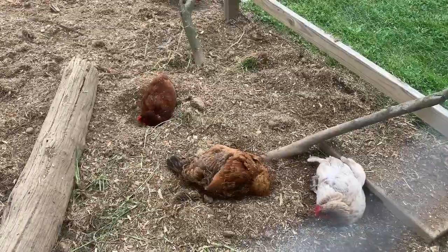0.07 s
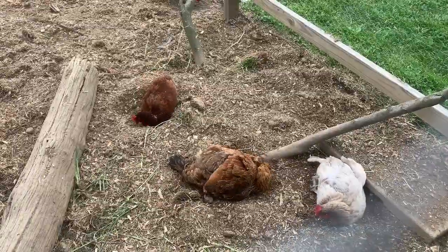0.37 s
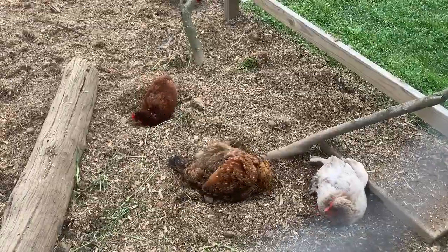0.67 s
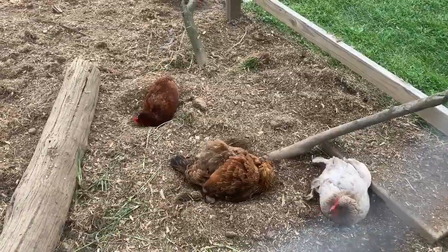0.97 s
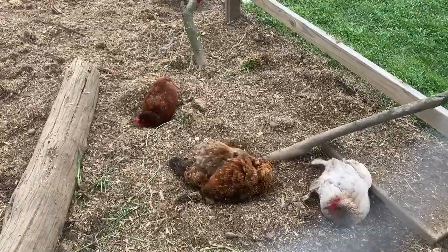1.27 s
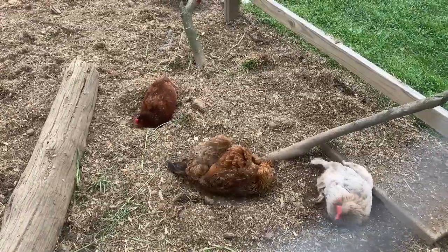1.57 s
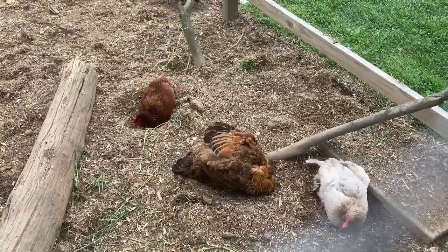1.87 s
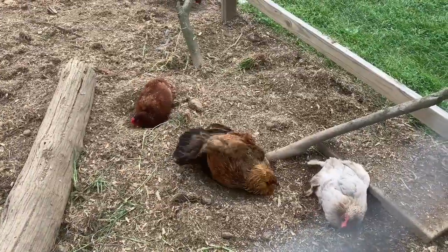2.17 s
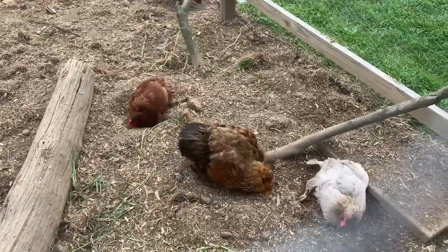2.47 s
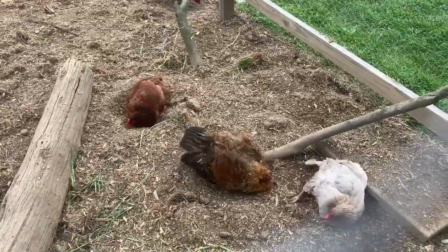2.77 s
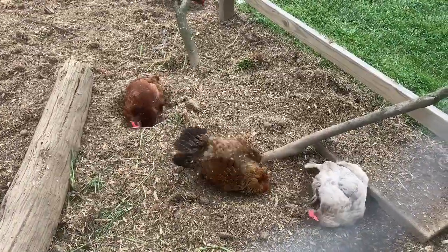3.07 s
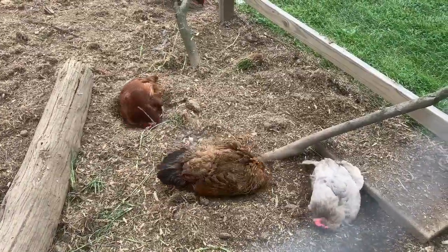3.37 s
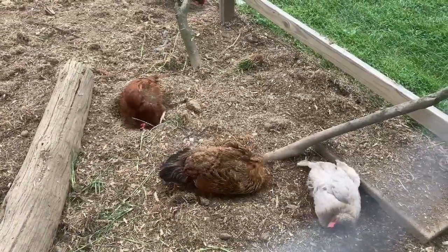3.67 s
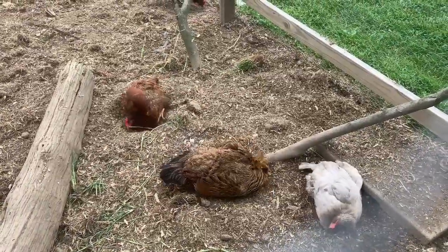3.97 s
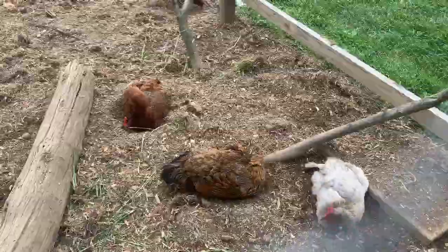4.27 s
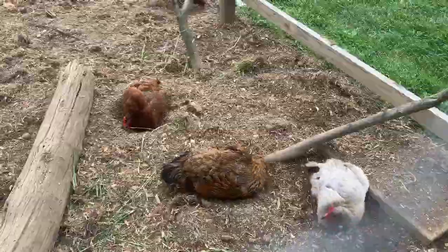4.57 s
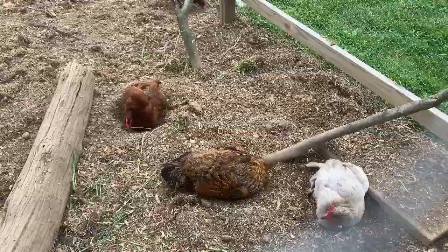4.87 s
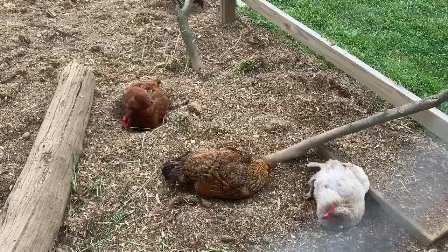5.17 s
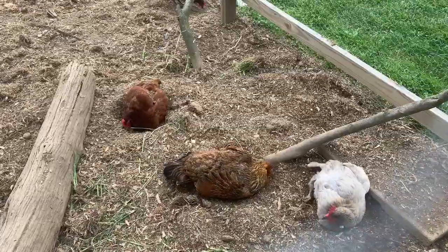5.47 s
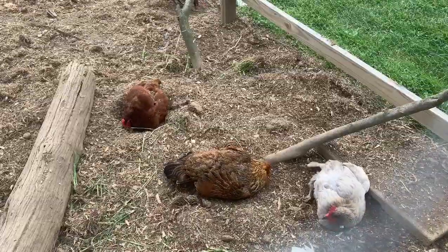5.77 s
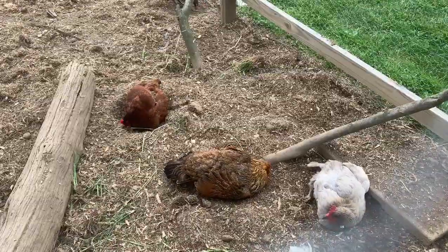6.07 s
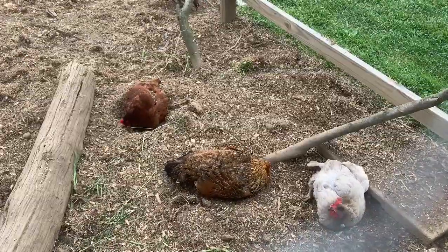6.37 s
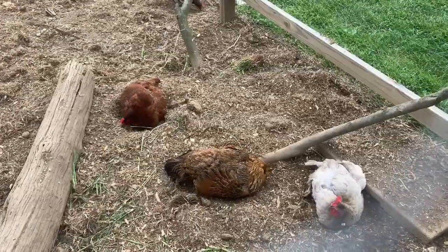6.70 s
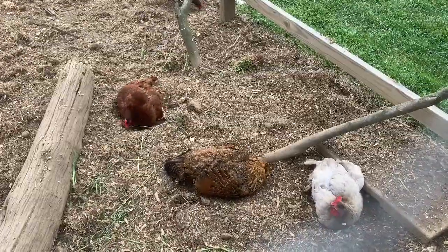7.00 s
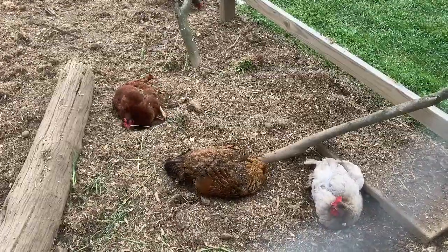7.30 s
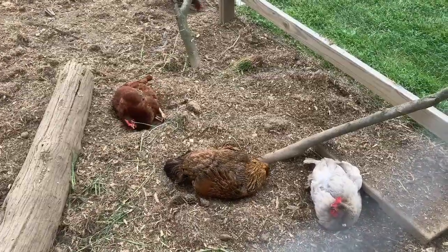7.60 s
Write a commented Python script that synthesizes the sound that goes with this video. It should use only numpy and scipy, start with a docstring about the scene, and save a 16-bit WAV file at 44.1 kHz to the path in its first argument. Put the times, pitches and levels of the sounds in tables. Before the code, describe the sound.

A hen shakes dry dirt from her feathers and a songbird trills, with knocks and rubbing on the microphone.

```python
"""Hens in a dust bath

In a garden run one hen shakes dry dirt out of her feathers: they swish, and crumbs and grit patter down.
Another pecks at a board, which thuds. A songbird whistles one loud phrase to the right, and others answer
from farther off, over a low outdoor rumble. Fingers knock and slide on the hand-held microphone's case."""
import sys
import numpy as np
from scipy import signal
from scipy.fft import rfft, irfft
from scipy.io import wavfile

SR = 44100
rng = np.random.default_rng(int(sys.argv[2]) if len(sys.argv) > 2 else 0)


def put_to_file(sound):
    """Save the sound as 16-bit audio at rate SR, in the file named by the first command-line argument."""
    columns = np.atleast_2d(sound).T  # one column per channel
    safe = np.clip(columns, -1, 1)
    whole_steps = np.round(safe * 32767)
    wavfile.write(sys.argv[1], SR, whole_steps.astype(np.int16))


N = 341334
TIME = np.arange(N) / SR
BINS_HZ = np.maximum(np.arange(N // 2 + 1) * SR / N, 1)


def amp(db):
    """Turn decibels into a number to multiply by."""
    return 10 ** (np.asarray(db) / 20)


def rms_one(x):
    """Scale a sound so that its average strength (rms) is 1."""
    return x / np.sqrt(np.mean(x ** 2) + 1e-20)


def in_time(rows):
    """Join rows of a time and its values into curves, one value per sample."""
    s, *columns = np.transpose(rows)
    return [np.interp(TIME, s, c) for c in columns]


def at_bins(points):
    """Join rows of a frequency and its value into a curve over the whole spectrum."""
    hz, value = np.transpose(points)
    return np.interp(np.log(BINS_HZ), np.log(hz), value)


def gate(start, end, edge):
    """Fade in, hold at 1 and fade out between two times."""
    return np.clip(np.minimum(TIME - start, end - TIME) / edge, 0, 1)


def bloom(t, peak_s):
    """A loudness curve that rises to 1 at its peak time and dies away."""
    return t / peak_s * np.exp(1 - t / peak_s)


def panned(pan_db):
    """Left and right gains; a positive balance leans left."""
    return amp(np.array([[.5], [-.5]]) * pan_db)


def placed(x, pan):
    """Give each frequency of a stereo sound its own left-right balance."""
    return irfft(rfft(x) * panned(at_bins(pan)), N)


def band(x, low_hz, high_hz, order):
    """Keep the part of a sound between two frequencies."""
    return signal.sosfilt(signal.butter(order, [low_hz, high_hz], "band", fs=SR, output="sos"), x)


def contact(low_hz, high_hz, order):
    """A tap: one short push through a broad resonance, with a peak of 1."""
    pulse = band(signal.unit_impulse(SR // 10), low_hz, high_hz, order)
    return pulse / np.abs(pulse).max()


def add(track, s, sound):
    """Mix a sound into a track, starting at s seconds."""
    i = max(int(s * SR), 0)
    track[..., i:i + sound.shape[-1]] += sound[..., :N - i]


def drift(per_s, t=TIME):
    """A random wander that heads for a new value per_s times a second."""
    knots = rng.standard_normal(500)
    return np.interp(t * per_s, np.arange(len(knots)), knots)


def hiss():
    """Two unrelated white noises, left and right."""
    return rng.standard_normal((2, N))


def grains(per_s, spread_db):
    """Tiny random clicks, most small and a few large."""
    sizes = amp(spread_db * np.minimum(rng.exponential(1, N), 4))
    return hiss() * sizes * (rng.random(N) < per_s / SR)


def coloured(source, spectrum, pan):
    """Give a pair of noises a tone colour and a direction; their average has strength 1."""
    out = irfft(rfft(source) * amp(at_bins(spectrum)) * panned(at_bins(pan)), N)
    return out / np.std(out.mean(axis=0))


# The tone colours of four background noises. Each row: frequency in Hz, relative level in dB.
RUMBLE_TONE = [(20, -36.5), (35, -18), (46, -15.5), (57, 8.5), (68, -6.5), (100, -6), (125, -12),
               (180, -22.5), (300, -79)]
TRAFFIC_TONE = [(90, -22.5), (140, -2), (200, 0), (270, -9), (380, -10), (520, -35), (900, -48.5)]
WASH_TONE = [(250, -18), (450, 5), (780, 2.5), (1150, -4.5), (1350, -7), (1560, -7.5), (1900, -16),
             (2600, -21), (4000, -52)]
AIR_TONE = [(1000, -13.5), (1800, -8), (2250, -2), (2950, -3), (3700, -2.5), (4700, -5.5), (6000, -8.5),
            (8500, -2), (10000, -4), (16000, -6)]
# Where the background sits. Each row: frequency in Hz, left minus right in dB.
OUTDOOR_PAN = [(900, 0), (1500, 0), (2500, -4.5), (5500, -4.5), (7500, -0.5)]
# Swells on top of the steady rumble; the one at 3.28 s is the low judder of a finger brushing the case. Each
# row: time of the peak in seconds, level in dB.
RUMBLE_SWELLS = [(0.58, -43), (2.32, -46), (3.28, -44.5), (4.03, -45), (7.15, -42), (7.449, -42.5)]
# How the traffic (in two lists) and the wash rise and fall. Each row: time in seconds, relative level in dB.
TRAFFIC_LEVEL = [
    [(0.0, -55.5), (0.26, -62), (1.17, -56), (3.15, -66)],
    [(4.05, -64), (4.48, -64), (5.65, -61), (7.4, -65)],
]
WASH_LEVEL = [(0.3, -67.5), (1.1, -64), (2.8, -63.5), (3.1, -65), (5.7, -64), (7.3, -68)]


def outdoors(rumble_db=-49.5, swell_s=0.079, traffic_boost_db=3, air_db=-81):
    """Low rumble, far traffic, the wash of the surroundings, and thin air with a stir of dry litter."""
    traffic_db, = in_time(np.vstack(TRAFFIC_LEVEL))
    wash_db, = in_time(WASH_LEVEL)
    swells = sum(amp(db) * np.exp(-.5 * ((TIME - s) / swell_s) ** 2) for s, db in RUMBLE_SWELLS)
    rumble = np.hypot(amp(rumble_db), swells) * coloured(hiss(), RUMBLE_TONE, OUTDOOR_PAN)
    traffic = amp(traffic_db + traffic_boost_db) * coloured(hiss(), TRAFFIC_TONE, OUTDOOR_PAN)
    wash = amp(wash_db) * coloured(hiss(), WASH_TONE, OUTDOOR_PAN)
    air_level = amp(air_db + .8 * drift(24))
    air_and_litter = hiss() + 0.19 * rms_one(grains(per_s=300, spread_db=3.5))
    return rumble + traffic + wash + air_level * coloured(air_and_litter, AIR_TONE, OUTDOOR_PAN)


# Echoes from the ground, fence and house. Each row: delay in seconds, dB relative to the direct sound.
ECHOES = [(.0062, -2), (0.0179, -4.5), (0.027, -16), (.036, -19)]


def yard(x, direct_db, scatter_db, tail_s, fence_db=-6):
    """The direct sound, echoes that differ at each ear, a blur from the fence and a scattered tail."""
    t = TIME[:SR // 2]
    tail, fence = rng.standard_normal((2, 2, len(t)))
    tail *= amp(-60 * t / tail_s)
    fence *= bloom(t, peak_s=.014)
    response = amp(scatter_db) * tail / np.linalg.norm(tail[0])
    response += amp(direct_db + fence_db) * fence / np.linalg.norm(fence[0])
    response[:, 0] += amp(direct_db)
    for delay, db in ECHOES:
        arrivals = (delay * SR + rng.uniform(0, 20, 2)).astype(int)
        response[[0, 1], arrivals] += amp(direct_db + db)
    return signal.fftconvolve(response, x[None], axes=1)[:, :N]


def whistle(length, start_hz, middle_hz, end_hz, db, growth_db=0, wobble_hz=0):
    """A bird's note: a pure tone curves through three pitches, and a fast wobble makes it buzz."""
    t = TIME[:int(length * SR)]
    progress = t / t[-1]
    wobbles_per_s = 150 * (1 + 0.059 * drift(66, t))
    wobble = np.sin(2 * np.pi * np.cumsum(wobbles_per_s) / SR) + 0.39 * drift(300, t)
    curve = np.polyfit([0, .5, 1], [start_hz, middle_hz, end_hz], 2)
    hz = np.polyval(curve, progress) + wobble_hz * wobble
    phase = 2 * np.pi * np.cumsum(hz) / SR
    overtone = amp(np.interp(hz, [3000, 6600, 7400], [-50, -35, -21])) * np.sin(2 * phase)
    loudness = amp(db + growth_db * (progress - .5)) * signal.windows.tukey(len(t), .4)
    return loudness * (np.sin(phase) + overtone)


def glide(length, start_hz, end_hz, db, wobble_hz):
    """An evenly loud note that slides straight from one pitch to another."""
    return whistle(length, start_hz, (start_hz + end_hz) / 2, end_hz, db, wobble_hz=wobble_hz)


def notes(table):
    """Play a table of whistled notes."""
    out = np.zeros(N)
    for s, *note in table:
        add(out, s, whistle(*note))
    return out


# One far bird's falling note and another's thin high call. Each row: start in seconds, level in dB.
FALLING_CALLS = [(0.099, -77), (0.375, -71.5), (0.672, -71.5), (0.963, -75)]
HIGH_CALLS = [(0.25, -75), (1.42, -68.5), (7.271, -82.5)]
# Short gliding answers. Each row: start and length in seconds, first and last pitch in Hz,
# level in dB, pitch wobble in Hz.
ANSWERS = [(0.518, 0.074, 3210, 3450, -78, 141), (0.61, 0.047, 3320, 3460, -74, 90),
           (5.179, 0.053, 3060, 3780, -64, 209.5), (5.248, 0.067, 3110, 3750, -61, 79),
           (5.354, 0.049, 4220, 4110, -62.5, 110), (5.453, 0.05, 2530, 2115, -66.5, 96),
           (5.542, 0.061, 2470, 2110, -65.5, 70.3), (6.395, 0.044, 3440, 3050, -77, 89.7),
           (6.453, .035, 4200, 5000, -80.5, 197), (6.564, 0.032, 3300, 3500, -84, 120),
           (6.626, 0.043, 4550, 4740, -80, 60), (6.64, 0.12, 2860, 2700, -80, 70),
           (6.77, 0.11, 2570, 3620, -75.5, 260), (6.886, 0.13, 3200, 2800, -78, 60.8),
           (7.034, 0.061, 3270, 2970, -82, 39.7), (7.14, 0.041, 3160, 2990, -87, 40),
           (7.264, 0.1, 4536, 4460, -77, 22), (7.333, 0.063, 2930, 2880, -76.5, 40),
           (7.443, 0.083, 4155, 4120, -66.5, 35), (7.613, 0.084, 4430, 4315, -76, 30),
           (7.705, 0.039, 2890, 2800, -76, 25)]


def far_birds(chatter_db=-85.5, wobble_hz=191):
    """Distance smears the calls into their echoes; behind them many more birds chatter."""
    out = np.zeros(N)
    for s, db in FALLING_CALLS:
        add(out, s, whistle(.12, 4300, 3740, 3324, db, growth_db=-5, wobble_hz=250))
    for s, db in HIGH_CALLS:
        add(out, s, glide(0.1, 8400, 7660, db, wobble_hz))
    for s, *note in ANSWERS:
        add(out, s, glide(*note))
    for when, length, pitch, slope in rng.random(size=(110, 4)):
        hz = 2150 + 1150 * pitch
        chirp = glide(0.022 + 0.12 * length, hz, hz + 800 * (slope - .5), chatter_db, wobble_hz)
        add(out, when * TIME[-1], chirp)
    return yard(out, direct_db=-1.0, scatter_db=3, tail_s=0.31) * panned(-5.0)


# Light brushes of a finger; the row at 7.47 s is the rustle that follows the knock at 7.48 s. Each row: start
# and length in seconds, level in dB, growth in dB.
BRUSHES = [(0.707, 0.26, -57, -7.5), (1.67, 0.066, -52, -6), (3.215, 0.12, -45, 7),
           (3.321, 0.15, -53.5, -2), (4.302, 0.27, -57, -7), (5.351, 0.29, -54, -7.5),
           (6.058, 0.077, -55.5, -18), (7.47, 0.089, -55.5, -7), (7.585, 0.16, -58, -10)]
# One firm slide. Each row: time in seconds, judder level in dB, friction level in dB.
SLIDE = [(3.45, -33, -40), (3.48, -31, -41), (3.636, -31, -46), (3.702, -37.5, -48.5), (3.738, -31, -50),
         (3.784, -36, -54), (3.822, -30, -51.5), (3.89, -40, -45), (3.94, -30.5, -46)]
# The tone colours of the rubbing. Each row: frequency in Hz, relative level in dB.
BRUSH_TONE = [(30, -29), (55, 7), (90, 12.5), (200, 5.5), (450, 1.5), (750, 4.5), (1250, -3.5), (1600, -10),
              (2000, -7), (2600, -19.5), (4000, -35)]
JUDDER_TONE = [(21, 2), (35, 0), (49, 0.5), (103, 0), (179, -7), (205, -11), (286, -15.5), (420, -24.5),
               (550, -51), (920, -120)]
FRICTION_TONE = [(210, -22), (350, 4), (476, -3.5), (575, 5), (880, 5), (998, -10), (1130, -0.5),
                 (1980, -26), (2300, -53), (2990, -66), (5060, -120)]
# Where the rubbing sits. Each row: frequency in Hz, left minus right in dB.
CASE_PAN = [(400, 2), (800, 2), (1200, 4), (1600, 5), (2500, -1.5)]


def rubbing():
    """Skin sticks and slips on the microphone case: light brushes, and a slide that makes it judder."""
    pressure = np.zeros(N)
    for s, length, db, growth_db in BRUSHES:
        from_middle = np.clip((TIME - s) / length - .5, -1, 1)
        pressure += gate(s, s + length, edge=0.02) * amp(db + growth_db * from_middle)
    brushes = pressure * coloured(grains(per_s=4000, spread_db=0.66), BRUSH_TONE, CASE_PAN)
    judder_db, friction_db = in_time(SLIDE)
    judder = amp(judder_db) * coloured(hiss(), JUDDER_TONE, CASE_PAN)
    friction = amp(friction_db) * coloured(grains(per_s=2500, spread_db=0.44), FRICTION_TONE, CASE_PAN)
    return brushes + (judder + friction) * gate(start=3.437, end=3.953, edge=0.003)


def rocking(t, from_hz=245, to_hz=60, fall_s=0.0062):
    """After a knock the case rocks in the hand, falling in pitch as it settles."""
    hz = to_hz + (from_hz - to_hz) * np.exp(-t / fall_s)
    return np.sin(2 * np.pi * np.cumsum(hz) / SR) * bloom(t, peak_s=0.0033)


# Knocks on the case. Each row: time in seconds, the thud's level in dB, pitch in Hz and rise in seconds,
# then the levels in dB of the rocking, knuckle, tick and ring.
KNOCKS = [(0.6937, -4, 750, 0.00096, -16, -14, -44, -39.5),
          (1.5666, -36, 727, 0.0022, -37, -48.5, -52, -46.5),
          (1.681, -36, 585, 0.0015, -38.5, -65, -65, -49),
          (2.5136, -32.5, 750, 0.0016, -36.5, -54, -56, -45.5),
          (2.6455, -40.5, 720, 0.0021, -38, -42, -57, -44.5), (6.072, -35, 670, 0.0018, -40, -41, -50, -49),
          (7.4791, -20.5, 790, 0.0016, -32.5, -30.5, -34.5, -37.5),
          (7.666, -44, 814, 0.002, -42, -61, -71, -47)]


def knocks(tick_lead_s=0.0024, knuckle_lead_s=.0031, ring_decay_s=0.033):
    """The fingertip ticks and the knuckle taps, then the case gives a hollow thud, rings and rocks."""
    tick, knuckle = contact(1500, 3800, order=2), contact(1230, 1645, order=3)
    t = TIME[:len(tick)]
    sway = rocking(t)
    body, ticks = np.zeros((2, 2, N))
    for s, thud_db, thud_hz, rise_s, sway_db, knuckle_db, tick_db, ring_db in KNOCKS:
        burst = rng.standard_normal(len(t)) * np.exp(-t / 0.0013)
        crackle = signal.fftconvolve(tick, burst)[:len(t)]
        thud = np.sin(2 * np.pi * thud_hz * t) * bloom(t, rise_s) ** 2
        ring = band(rng.standard_normal(len(t)) * np.exp(-t / ring_decay_s), 580, 1050, order=3)
        hollow = amp(thud_db) * thud + amp(ring_db) * ring / np.abs(ring).max()
        add(ticks, s - tick_lead_s, amp(tick_db) * crackle / np.abs(crackle).max() * panned(10.0))
        add(body, s - knuckle_lead_s, amp(knuckle_db) * knuckle * amp([[0], [-17]]))   # mostly left
        add(body, s, hollow * panned(4.5) + amp(sway_db) * sway)
    soft_finger = signal.butter(4, 1800, fs=SR, output="sos")   # a soft finger dulls the knock
    return ticks + signal.sosfilt(soft_finger, body)


# Held notes. Each row: start and length in seconds, first, middle and last pitch in Hz,
# level and growth in dB, pitch wobble in Hz.
WHISTLES = [(2.955, 0.041, 3850, 3960, 3870, -53.5, 1, 5.9), (2.995, 0.074, 3934, 3897, 3890, -39, -6, 11),
            (4.815, 0.097, 2790, 2745, 2690, -48, 3, 7.6), (4.89, 0.116, 2710, 2750, 2765, -57, -4, 5.6)]
# The held notes and the song come from the right. Each row: frequency in Hz, left minus right in dB.
BIRD_PAN = [(2700, -7.5), (3900, -7.5), (5500, -4.5), (6500, -7), (7500, -1)]


def held_whistles(wall_delay_s=0.26, wall_db=-22.5):
    """Clean, steady bird notes linger in the yard and come back once from a far wall."""
    direct = notes(WHISTLES)
    out = direct + yard(direct, direct_db=-19.0, scatter_db=-14, tail_s=0.85)
    add(out, wall_delay_s, amp(wall_db) * out)
    return placed(out, BIRD_PAN)


def rattle(count=12, start_s=3.6805, spacing_s=.0203, rise_s=0.016, fade_db_per_s=72):
    """The songbird's fast run of rising chirps, which swells quickly and fades slowly."""
    out = np.zeros(N)
    for t in spacing_s * np.arange(count):
        db = -46 - fade_db_per_s * t - 12 * np.exp(-t / rise_s)
        add(out, start_s + t, whistle(0.0174, 3440, 3900, 4910, db, growth_db=4, wobble_hz=90))
    return out


# The beat of the trill. Each entry: start of one upward sweep in seconds.
TRILL_STARTS = [3.945, 4.0295, 4.1205, 4.2115, 4.302, 4.390, 4.486, 4.583]


def trill(sweep_db=-41, low_db=-54.5):
    """Steep upward sweeps, no two quite alike; after each, soft low notes sink and settle."""
    sweeps, soft = np.zeros((2, N))
    for s in TRILL_STARTS:
        stretch, bend, effort = rng.standard_normal(3)
        length, db = .0155 * (1 + .04 * stretch), sweep_db + 0.81 * effort
        add(sweeps, s, whistle(length, 4860, 7100 + 80 * bend, 7620, db, growth_db=1.5, wobble_hz=150))
        sinking = whistle(0.022, 3796, 3400, 2540, low_db - 2 + effort, growth_db=10, wobble_hz=267)
        settling = whistle(0.0315, 3140, 3080 + 40 * bend, 3010, low_db, wobble_hz=79.6)
        add(soft, s + .036, sinking)
        add(soft, s + 0.055, settling)
    return sweeps, soft


# The songbird's single notes. Each row: start and length in seconds, first, middle and last pitch in Hz,
# level and growth in dB, pitch wobble in Hz.
SONG = [(2.81, 0.027, 3950, 4480, 4930, -45.5, 20, 220), (3.052, 0.031, 3850, 3290, 3050, -49, -24, 125),
        (3.317, 0.03, 3730, 4334, 5230, -42, 19.5, 257), (3.352, 0.081, 4900, 4990, 5080, -52.5, 4, 500),
        (3.547, 0.102, 7790, 6564, 6225, -42, 8.5, 24.7), (3.678, 0.013, 4700, 5000, 5500, -62, 6, 100),
        (4.694, 0.023, 5430, 5100, 4250, -55.5, 8, 210)]


def near_bird():
    """A songbird sings buzzes, a rattle and a trill; its low notes spread widely and return as echoes."""
    sweeps, soft = trill()
    bright = yard(notes(SONG) + rattle() + sweeps, direct_db=2.0, scatter_db=-8.0, tail_s=0.59)
    blurred = yard(soft, direct_db=-3.5, scatter_db=-3.5, tail_s=0.57)
    return placed(bright + blurred, BIRD_PAN)


# The hens' voices. Each row: start and length in seconds, first, middle and last pitch in Hz,
# level and growth in dB, pitch wobble in Hz.
HEN_NOTES = [(0.0, 0.067, 650, 619, 674, -48.5, -4, 51), (7.415, 0.072, 1480, 1440, 1390, -63.5, 17, 45),
             (7.63, 0.082, 1440, 1490, 1550, -64, 2, 40)]


def hen_calls():
    """The hens make a few soft, slightly buzzy notes."""
    return notes(HEN_NOTES)


# Pecks at the board. Each row: start in seconds, tick level in dB, thud level in dB.
PECKS = [(5.9112, -41.5, -40), (5.9408, -52, -53), (5.9816, -57, -48), (6.1424, -53.5, -42)]
# The tones in a beak's tick. Each row: pitch in Hz, relative level in dB, decay time in seconds.
BEAK_TONES = [(1900, -7, 0.001), (2920, -9, 0.002), (5050, -7, .0014), (6200, -14, .0006),
              (8060, 0, 0.0024), (9200, -5, .0005), (12000, -14, 0.00036)]


def pecks(board_hz=750, board_lag_s=0.00254):
    """A hen's beak ticks with a short bright ring, and the hard board answers with a hollow thud."""
    out, t = np.zeros((2, N)), TIME[:SR // 20]
    thud = np.sin(2 * np.pi * board_hz * t) * bloom(t, peak_s=0.0011) ** 2
    for s, tick_db, thud_db in PECKS:
        tick = np.zeros(len(t))
        for k, (hz, db, decay) in enumerate(BEAK_TONES):
            strength = amp(db + 1.5 * rng.standard_normal()) * (-1) ** k   # every other tone is flipped
            tick += strength * np.sin(2 * np.pi * hz * t) * np.exp(-t / decay)
        add(out, s, amp(tick_db) * tick * panned(-1.5))
        add(out, s + board_lag_s, amp(thud_db) * thud)
    return out


# Single bits of grit. Each row: start in seconds, peak level in dB.
GRIT = [(0.893, -41), (2.2625, -27), (2.4556, -32), (2.6266, -30), (2.6377, -33), (2.6512, -36),
        (2.6656, -26), (3.344, -35.5), (3.362, -45), (3.865, -39.5)]


def grit():
    """Hard bits thrown from the feathers land with one bright snap each."""
    out, snap = np.zeros((2, N)), contact(6500, 14500, order=2)
    for s, db in GRIT:
        add(out, s, amp(db) * snap)
    return out


def crumbs(sizes=8, per_s=4900, ring_cycles=9.5):
    """Bits of dirt and chaff land at random, each ticking briefly at a pitch set by its size."""
    out = np.zeros((2, N))
    for hz in np.geomspace(2000, 15000, sizes):
        decay = np.exp(-np.log(1000) * hz / (ring_cycles * SR))   # falls 60 dB in ring_cycles
        resonance = [1, -2 * decay * np.cos(2 * np.pi * hz / SR), decay * decay]
        landings = grains(per_s / sizes, spread_db=0.5) + 1e-18
        out += signal.lfilter([1, 0, -1], resonance, landings) * (1 - decay)
    return rms_one(out)


# Ruffles of the feathers. Each row: time of the peak in seconds, relative level in dB.
RUFFLES = [(1.835, -62), (2.0, -64), (2.08, -63), (2.267, -52.5), (2.48, -51.5), (2.675, -52.5),
           (2.778, -54), (2.93, -53), (3.039, -57.5), (3.26, -67)]
# Flicks of dirt. Each row: start in seconds, relative level in dB, decay time in seconds.
FLICKS = [(0.843, -73, 0.12), (0.889, -55.5, 0.0077), (1.279, -66.5, 0.017), (1.805, -67, .006),
          (2.234, -44, 0.0075), (2.39, -53.5, 0.042), (2.4242, -34.5, 0.0095), (2.649, -42.5, 0.035),
          (2.899, -45.5, 0.026), (2.922, -47.5, 0.021), (5.645, -72, 0.053), (5.732, -68, 0.02)]
# The tone colour of dirt and feathers. Each row: frequency in Hz, relative level in dB.
DIRT_TONE = [(250, 15), (650, 8.5), (1300, 1.5), (2000, 0.5), (3000, -3.5), (4000, 1), (5000, -4.5),
             (6200, 1), (7500, 1), (10000, 6), (12000, -1), (13300, 4.5), (16000, -2.5)]
# Where the dirt is heard. Each row: frequency in Hz, left minus right in dB.
DIRT_PAN = [(1500, 2.5), (2500, -6), (4000, -1), (5800, -7.5), (7200, 0.5)]


def dust_bath(rise_db_per_s=151, fall_db_per_s=95, flick_rise_s=0.0023):
    """Feathers swish and crumbs rain down as each ruffle swells and dies; each flick throws a spray."""
    ruffles = [amp(db - np.maximum(rise_db_per_s * (s - TIME), fall_db_per_s * (TIME - s)))
               for s, db in RUFFLES]
    shake = np.linalg.norm(ruffles, axis=0) * amp(2.5 + 0.87 * drift(45))
    flicks, t = np.zeros(N), TIME[:SR // 4]
    for s, db, decay in FLICKS:
        add(flicks, s - .001, amp(db) * np.exp(-t / decay) * (1 - np.exp(-t / flick_rise_s)))
    spatter = 0.48 * rms_one(grains(per_s=260, spread_db=3.5))
    dirt_and_feathers = crumbs() + spatter + hiss()
    return coloured(dirt_and_feathers, DIRT_TONE, DIRT_PAN) * np.hypot(shake, flicks)


def scene():
    """Everything that reaches the microphone."""
    hens = dust_bath() + grit() + pecks()
    voices = near_bird() + held_whistles() + far_birds() + hen_calls()
    return hens + voices + knocks() + rubbing() + outdoors()


# The microphone's stereo width. Each row: frequency in Hz, gain in dB of the left-right difference.
STEREO_WIDTH = [(100, -64), (300, -53), (600, -34), (1000, -4.5), (1400, 0.5), (6500, 2), (7600, -4.5),
                (8500, -13), (16000, -18.5)]
# How far the left side trails the right. Each row: frequency in Hz, lag in cycles.
TREBLE_LAG = [(1500, 0), (2500, .24), (3900, .33), (5500, .21), (6900, .24), (7400, .35), (8450, .5),
              (9300, .64), (10600, 1), (11300, 1), (13400, 1.5), (14000, 1.6), (15450, 2)]


def record(dry, low_cut_hz=40, high_cut_hz=15900):
    """The microphone narrows bass and top treble, delays the left treble and cuts extreme pitches."""
    left, right = rfft(dry)
    mid = (left + right) / 2
    side = (left - right) / 2 * amp(at_bins(STEREO_WIDTH))
    lag = np.exp(-2j * np.pi * at_bins(TREBLE_LAG))
    pair = irfft(np.array([(mid + side) * lag, mid - side]), N)
    pair = signal.sosfilt(signal.butter(6, low_cut_hz, "high", fs=SR, output="sos"), pair)
    return signal.sosfilt(signal.ellip(10, .2, 70, high_cut_hz, fs=SR, output="sos"), pair)


dry = scene()
out = record(dry)
put_to_file(out)
```